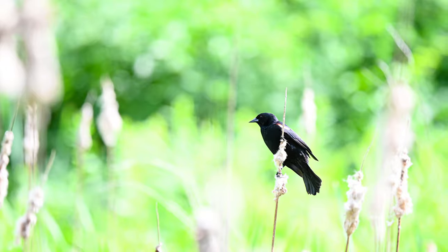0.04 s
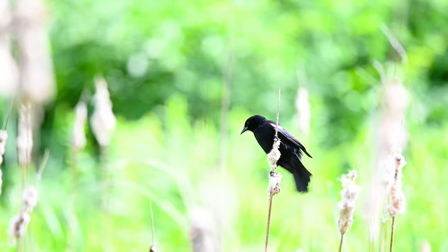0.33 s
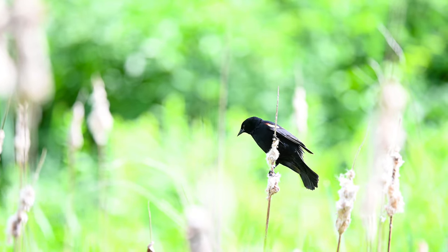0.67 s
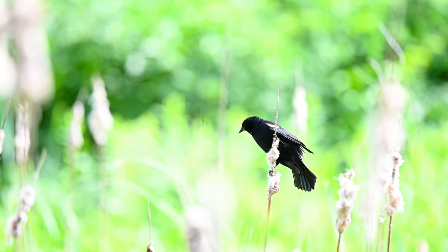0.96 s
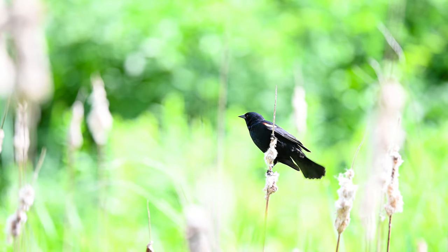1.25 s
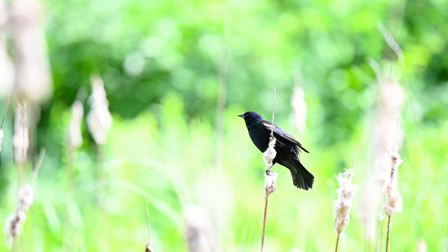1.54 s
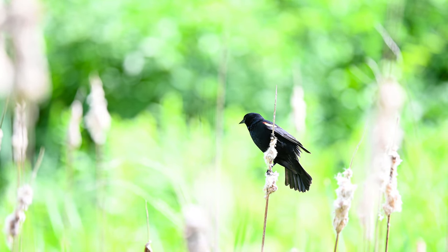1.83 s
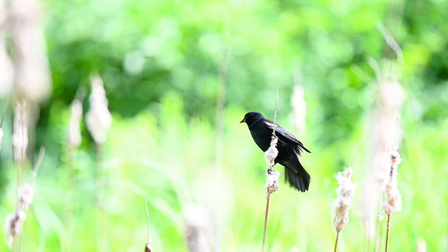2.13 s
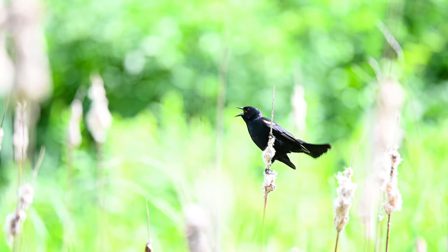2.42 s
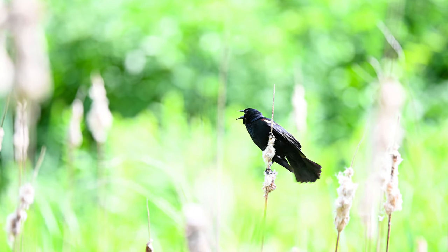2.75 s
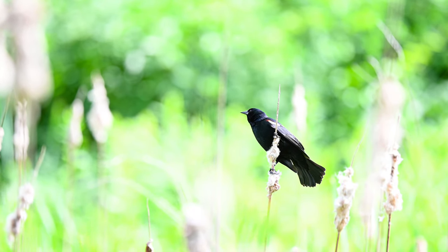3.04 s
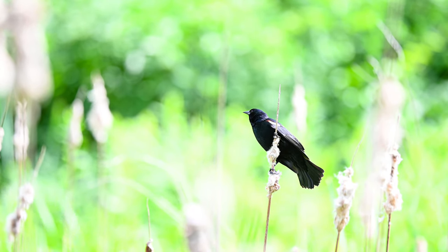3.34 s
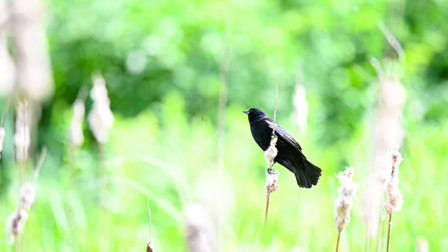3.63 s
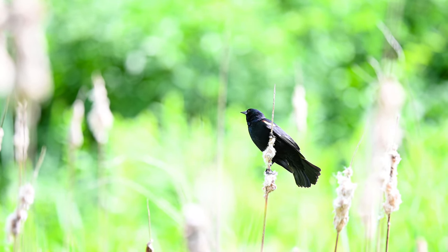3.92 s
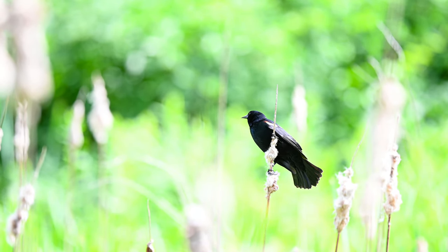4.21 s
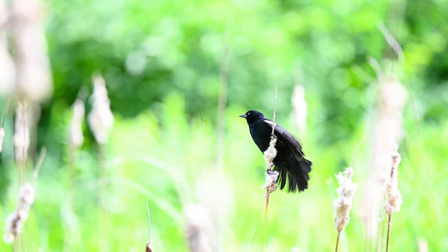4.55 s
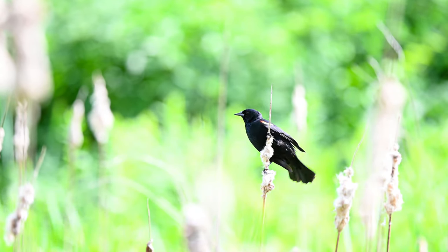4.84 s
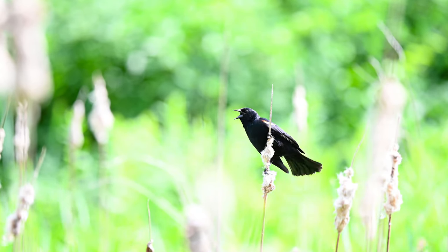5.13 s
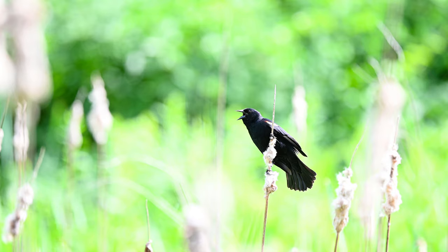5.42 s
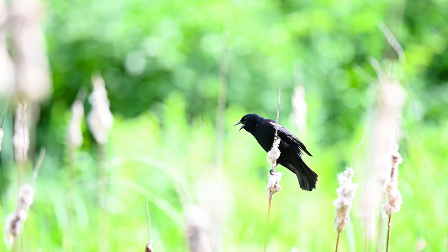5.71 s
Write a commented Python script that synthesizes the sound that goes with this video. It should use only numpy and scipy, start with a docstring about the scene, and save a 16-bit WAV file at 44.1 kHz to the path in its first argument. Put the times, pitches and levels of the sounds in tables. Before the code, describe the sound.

Two buzzy descending whistles from a blackbird ring across a marsh, with far road noise and tiny chirps behind them.

```python
"""A marsh on a stereo pair of microphones, with a road far off to the right.
Traffic rumbles and washes from the start, distant birds chip now and then, and an engine hum swells.
At 2.3 s, almost dead ahead, a red-winged blackbird on a cattail whistles a long falling call,
its syrinx tone roughened by fast vibrato. Echoes off the reeds beat against it and a line of
trees answers late. At 5.1 s it calls again, a shade lower."""
import sys
import numpy as np
from scipy import signal
from scipy.fft import rfft, irfft
from scipy.io import wavfile
from scipy.ndimage import uniform_filter1d

SR = 44100
rng = np.random.default_rng(int(sys.argv[2]) if len(sys.argv) > 2 else 0)


def materialize(psi):
    """Save the field psi as 16-bit PCM at rate SR to the path in sys.argv[1].

    A 1-D psi becomes a single channel; in a 2-D psi each row is a channel.
    """
    bounded = np.clip(np.atleast_2d(psi).T, -1, 1)
    quanta = np.round(bounded * 32767).astype(np.int16)
    wavfile.write(sys.argv[1], SR, quanta)


N = 263277
TIME = np.arange(N) / SR
FREQS = np.fft.rfftfreq(N, 1 / SR)

# spectrum of the far road: f/Hz, relative level/dB
ROAD_SPECTRUM = [(12, -46), (20, -17), (80, -0.5), (157, -4.5), (180, -8.5), (245, -5.5), (362, -13),
                 (505, -7.5), (597, -9.5), (1040, -8.5), (1670, -11), (3450, -23.5), (7950, -35),
                 (8880, -37.5), (15500, -42.5)]
# how alike the road is at the two microphones: f/Hz, correlation
ROAD_CORRELATION = [(60, 1), (290, 0.96), (640, 0.84), (1400, 0.87), (3000, 0), (5000, 0)]
# narrow humps of engine drone: f/Hz, width/Hz, level/dB
ENGINE_DRONES = [(92.2, 36, -54.5), (241, 67, -61.5), (1053, 270, -55.5)]
# rise and fall of the engine rumble: t/s, relative level/dB
RUMBLE_LEVELS = [(0.1, -51), (.5, -47), (1.1, -49), (1.7, -45.8), (3.1, -47.5), (5.9, -48.5)]
# distant birds: centre t/s, f/Hz, half-length/s, fall per half-length/octaves, level/dB,
# relative second harmonic/dB
FAR_CHIPS = [(0.177, 6460, 0.018, .4, -58, -30), (0.314, 4090, 0.013, 0.39, -51, -9.5),
             (1.018, 6270, .022, 0.28, -59, -30), (1.963, 4080, 0.022, 0.35, -55, -5),
             (3.26, 6180, .03, 0.1, -62, -26), (3.42, 7350, .03, -.06, -63, -33),
             (3.898, 7100, .08, 0.042, -65, -27), (4.01, 3990, .02, .28, -54.5, -1),
             (4.68, 6800, 0.019, .3, -60, -37)]
# the blackbird's whistles: start t/s, hold/s, pitch shift/Hz, gain/dB
BLACKBIRD_CALLS = [(2.328, 0.6, 49.5, 0.47), (5.142, 0.6416, -45, 0.94)]
# each whistle slides down and turns up at the end: t/s into the call, f/Hz
PITCH_GLIDE = [(0, 5177), (.1, 4659), (.185, 4337), (.29, 4120), (.35, 3967), (.44, 3620), (.555, 3292),
               (.61, 3280), (.7, 3423)]
# the throat favours some pitches and shuts out those over 5 kHz:
# pitch f/Hz, fundamental/dB, even harmonics/dB, third harmonic/dB
THROAT_RESPONSE = [(3330, -25.5, -56.5, -47.5), (3440, -29, -58.5, -42.5), (3850, -26.5, -46.5, -50),
                   (4090, -24, -45.5, -48.5), (4360, -26.5, -49, -46.5), (4767, -26.5, -47.5, -47.5),
                   (5290, -53.5, -57.5, -66), (5930, -43, -47, -66), (6700, -43.5, -51, -68)]
# close reflections off water and stalks: left delay/s, right delay/s, level/dB
CLOSE_REFLECTIONS = [(.0007, 0.00115, -21), (.0028, 0.0019, -11.5), (.0039, .0044, -13.5)]
# air and leaves take the highest overtones out of the long paths: f/Hz, gain/dB
LONG_PATH_COLOUR = [(3300, 3.0), (3900, 0.0), (4700, -1.0), (7000, 1.5), (11000, -9)]
# the blackbird's balance at the microphones: f/Hz, left minus right/dB
BIRD_BALANCE = [(3300, 0.5), (4600, -0.5), (6500, -0.5), (8500, 7), (11000, 6), (15000, 0)]


def undb(db):
    """Decibels to gain."""
    return 10 ** (np.asarray(db) / 20)


def unit(x):
    """Scale to rms 1."""
    return x / np.sqrt(np.mean(x ** 2))


def ramp(x):
    """Hold between 0 and 1."""
    return np.clip(x, 0, 1)


def across(points):
    """Points (f/Hz, value) joined on a log-frequency axis."""
    hz, value = np.transpose(points)
    return np.interp(np.log(FREQS + 1), np.log(hz), value)


def shape(x, gain):
    """Filter by a gain for each frequency."""
    return irfft(rfft(x) * gain, N)


def noise(gain):
    """Noise with the given spectrum."""
    return shape(rng.standard_normal(N), gain)


def walk(rate):
    """Smooth random drift of rms 1 that changes about rate times a second."""
    return unit(noise(np.exp(-(FREQS / rate) ** 2)))


def scatter(db, delay, rise, t60):
    """Stereo response of many small reflectors: it builds after a delay, then dies away (times in s)."""
    age = np.maximum(TIME[:2 * SR] - delay, 0)
    envelope = (1 - np.exp(-age / rise)) * np.exp(-np.log(1000) * age / t60)
    response = rng.standard_normal((2, len(age))) * envelope
    return undb(db) * response / np.sqrt(np.sum(response ** 2) / 2)


def echo(x, response):
    """A sound reaching the microphones through a left and right response."""
    return signal.fftconvolve(x[None], response, axes=1)[:, :N]


def from_right(pair, lag_s):
    """A sound from the right reaches the left microphone later (a negative lag: from the left)."""
    return np.array([shape(pair[0], np.exp(-2j * np.pi * FREQS * lag_s)), pair[1]])


def traffic(db=-43.5, flicker_db=1.1, rumble_hz=350, hiss_hz=4000,
            wash_start_db=-3.5, wash_hold_db=0.62, wash_build_s=1.94):
    """Engine rumble, tyre wash and faint hiss from a far road; the bass is alike at both microphones."""
    colour, alike = undb(across(ROAD_SPECTRUM)), across(ROAD_CORRELATION)
    mid, side = noise(colour * np.sqrt(1 + alike)), noise(colour * np.sqrt(1 - alike))
    road = undb(db) * unit(np.array([mid + side, mid - side]))
    for hz, width, drone_db in ENGINE_DRONES:
        road += undb(drone_db) * unit(noise(1 / (1 + (2 * (FREQS - hz) / width) ** 2)))
    rumble = shape(road, 1 / (1 + (FREQS / rumble_hz) ** 4))
    hiss = shape(road, 1 - 1 / (1 + (FREQS / hiss_hz) ** 4))
    wash = road - rumble - hiss
    rumble_db = np.interp(TIME, *np.transpose(RUMBLE_LEVELS))
    rumble_db -= np.median(rumble_db)
    # the tyre wash builds as the cars draw nearer, then holds
    wash_db = wash_hold_db + (wash_start_db - wash_hold_db) * np.exp(-TIME / wash_build_s)
    lean_left = np.array([[1], [-1]])
    return (rumble * undb(rumble_db + flicker_db * walk(2.9) + 0.49 * lean_left)
            + wash * undb(wash_db + 0.69 * walk(2.8) - 0.24 * lean_left)
            + hiss * undb(0.13 * wash_db))


def passing_hum(hz=245, width_hz=59, db=-50.5, peak_s=1.664, swell_s=0.32):
    """One engine out on the road: a narrow hum that swells and sinks back."""
    hum = unit(noise(1 / (1 + (2 * (FREQS - hz) / width_hz) ** 4)))
    return undb(db) * hum * np.exp(-((TIME - peak_s) / swell_s) ** 2)


def far_birds(rasp=0.294):
    """Short sliding chips from across the marsh, the steep ones raspy, blurred by the reeds."""
    chips, waver = np.zeros(N), walk(1240)
    for centre_s, hz, half_s, fall, db, second_db in FAR_CHIPS:
        span = np.abs(TIME - centre_s) < half_s
        progress = (TIME[span] - centre_s) / half_s  # -1 to 1
        octaves = fall * (rasp * (1 - progress) * waver[span] - progress)
        phase = 2 * np.pi * np.cumsum(hz * 2 ** octaves) / SR
        tone = np.sin(phase) + undb(second_db) * np.sin(2 * phase)
        chips[span] += undb(db) * np.cos(np.pi * progress / 2) ** 4 * tone
    return undb(-2.5) * chips + echo(chips, scatter(db=0, delay=0.0018, rise=.002, t60=0.15))


def vibrato(age, hz, sounding, rate_hz=75, at_pitch_hz=4220, depth=0.013, rest=0.00096,
            from_s=0.025, grow_s=0.05, until_s=0.588, calm_s=0.057):
    """Swing (share of the pitch) and phase of a vibrato that grows, holds, calms; slower at low pitch."""
    swing = rest + depth * ramp((age - from_s) / grow_s) * ramp((until_s - age) / calm_s)
    rate = rate_hz * (hz / at_pitch_hz) ** 0.755 * (1 + .022 * walk(40))
    return swing, 2 * np.pi * np.cumsum(sounding * rate) / SR


def whistle(start, held, shift_hz, call_db, flick_hz=1900, flick_s=.0165, throb=0.41, jitter=0.0035,
            fray=0.36, fourth_db=-2.5, release_db_per_s=370, overtone_extra_db_per_s=170):
    """A nearly pure syrinx tone flicks in from above and glides; level and overtones follow pitch."""
    age = np.maximum(TIME - start, 0)
    released_s = ramp(age - held)
    hz = np.interp(age, *np.transpose(PITCH_GLIDE)) + shift_hz + flick_hz * np.exp(-age / flick_s)
    throat_hz, *levels = np.transpose(THROAT_RESPONSE)
    first_db, even_db, third_db = (uniform_filter1d(np.interp(hz, throat_hz, c), 440) for c in levels)
    sounding = uniform_filter1d(1. * (TIME > start), size=90)
    envelope = sounding * undb(call_db - release_db_per_s * released_s)
    swing, flutter = vibrato(age, hz, sounding)
    swing_percent = 100 * swing
    # the tension that bends the pitch also pumps the loudness: each downstroke is the loud part
    pump = 1 + np.tanh(throb * swing_percent * (1 + .25 * walk(60))) * np.sin(flutter - 1.37)
    # the airflow shakes the membranes, which frays the overtones most
    shake = jitter * np.sqrt(swing_percent) * walk(520)
    pitch = hz * (1 + swing * np.sin(flutter) * (1 + 0.25 * walk(98)) + shake)
    phase = 2 * np.pi * np.cumsum(pitch) / SR
    tone = undb(first_db) * np.sin(phase)
    for k, overtone_db in enumerate((even_db, third_db, even_db + fourth_db), 2):
        grain = 1 + fray * np.tanh(2 * swing_percent) * walk(380)
        gain = undb(overtone_db - overtone_extra_db_per_s * released_s)
        tone += gain * grain * np.sin(k * phase) * (k * hz < SR / 2)
    return np.sqrt(2) * tone * envelope * pump


def blackbird():
    """Both calls reach the microphones directly and by way of water, reeds and the far trees."""
    voice = sum(whistle(*call) for call in BLACKBIRD_CALLS)
    near = scatter(db=-9, delay=.0005, rise=.001, t60=.045)
    near[:, 0] += undb(-2.04)  # direct path
    for left_s, right_s, db in CLOSE_REFLECTIONS:
        near[[0, 1], [int(left_s * SR), int(right_s * SR)]] += undb(db)
    reeds = scatter(db=-18.0, delay=.008, rise=0.0081, t60=0.88)
    trees = scatter(db=-29, delay=0.241, rise=0.02, t60=0.45)
    far = shape(echo(voice, reeds + trees), undb(across(LONG_PATH_COLOUR)))
    balance = undb(np.outer([1, -1], across(BIRD_BALANCE)) / 2)
    return shape(echo(voice, near) + far, balance)


def scene():
    """From the microphones, the road lies to the right and the blackbird a hair left of centre."""
    bird = from_right(blackbird(), lag_s=-1.4e-5)
    return bird + far_birds() + from_right(traffic() + passing_hum(), lag_s=9e-5)


def record(dry, open_s=.068, settle_s=0.031, top_hz=15800):
    """The recorder opens after a moment and cuts the top."""
    opening = np.where(TIME > open_s, 1 - .5 * np.exp(-np.abs(TIME - open_s) / settle_s), 0)
    lowpass = signal.ellip(12, .1, 80, top_hz, fs=SR, output="sos")
    return signal.sosfilt(lowpass, dry * opening)


dry = scene()
out = record(dry)
materialize(out)
```